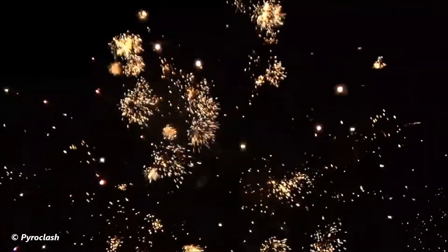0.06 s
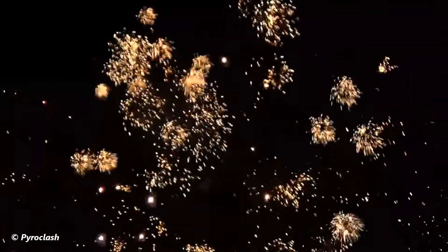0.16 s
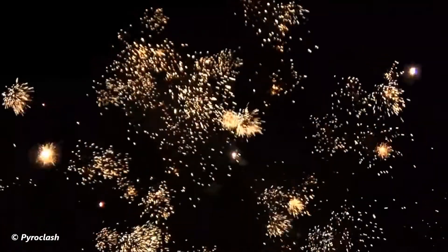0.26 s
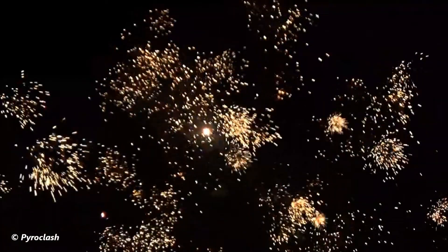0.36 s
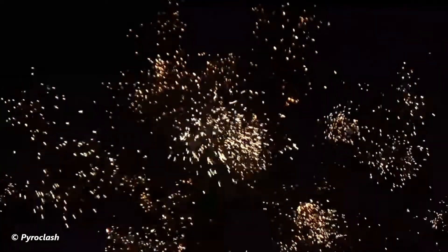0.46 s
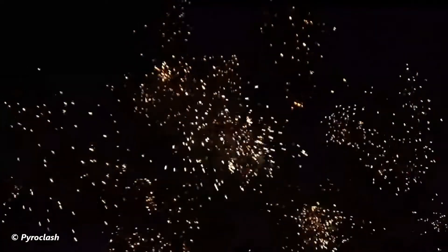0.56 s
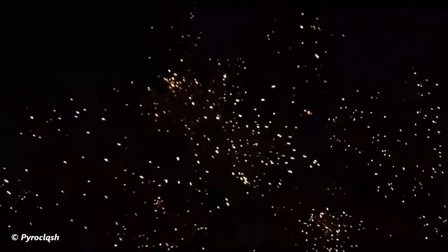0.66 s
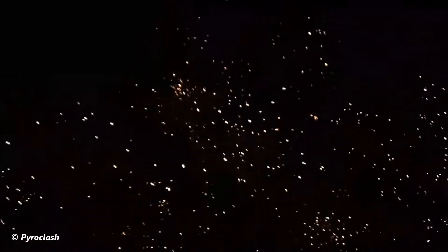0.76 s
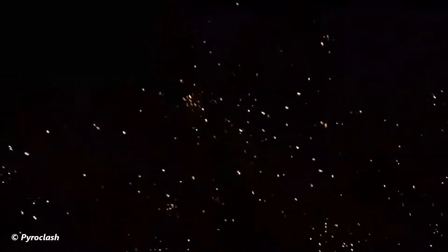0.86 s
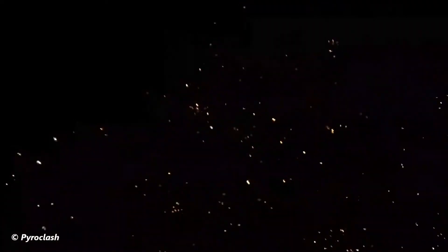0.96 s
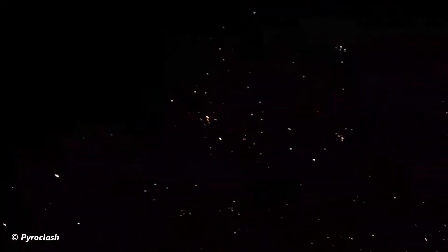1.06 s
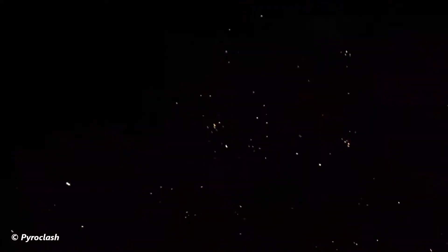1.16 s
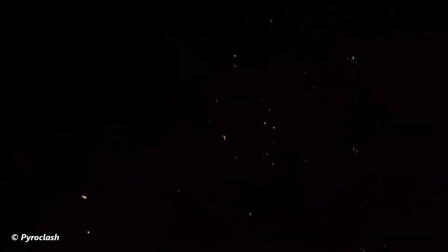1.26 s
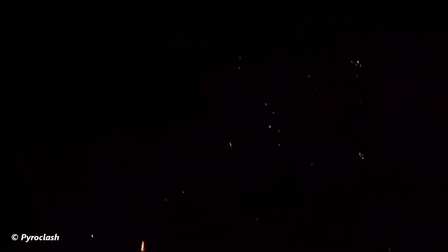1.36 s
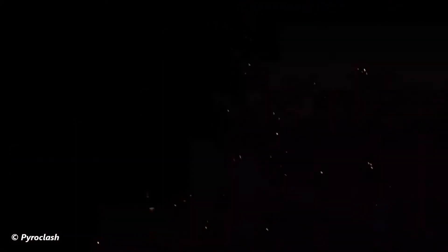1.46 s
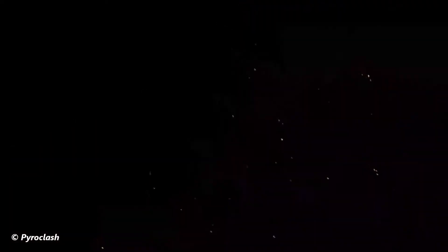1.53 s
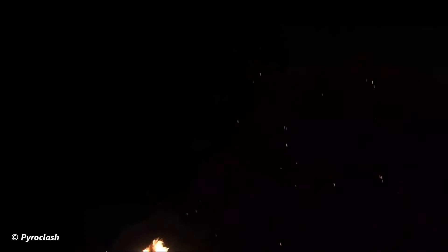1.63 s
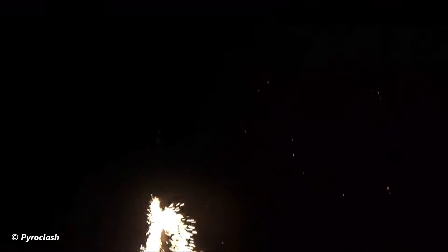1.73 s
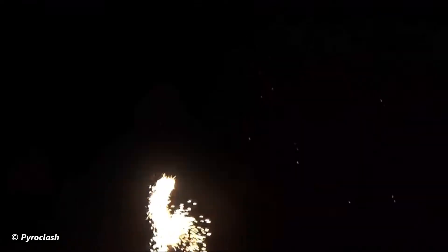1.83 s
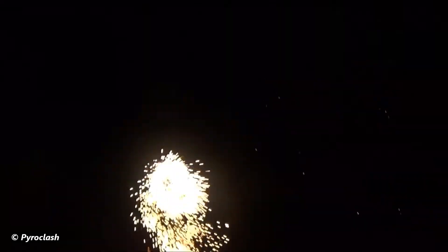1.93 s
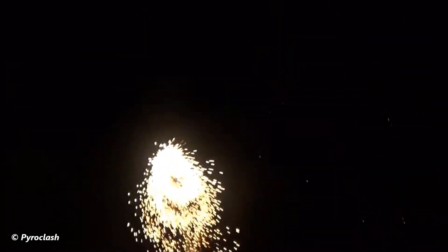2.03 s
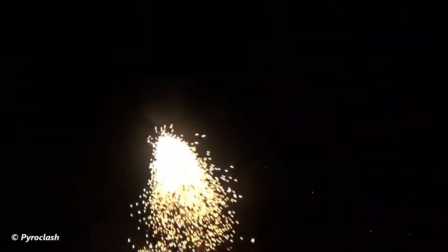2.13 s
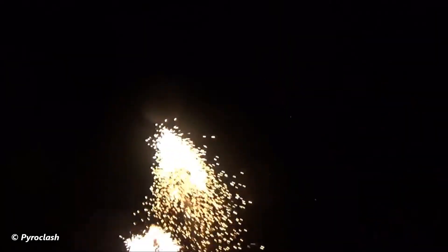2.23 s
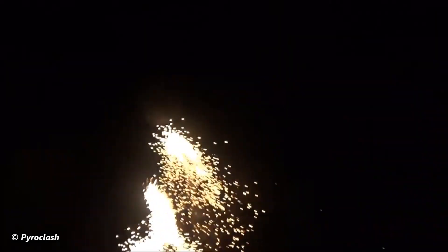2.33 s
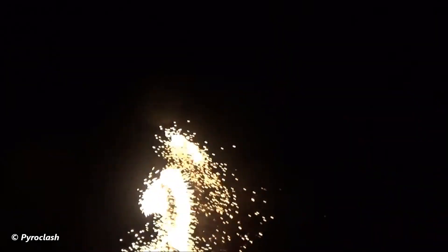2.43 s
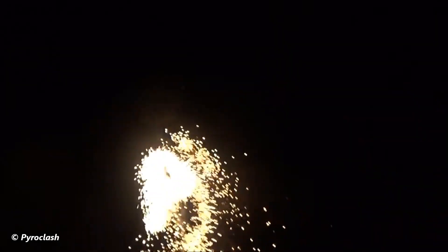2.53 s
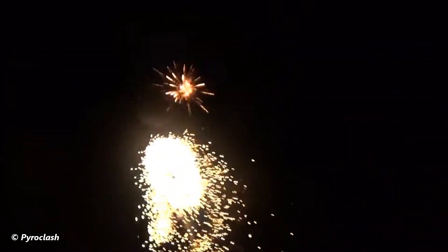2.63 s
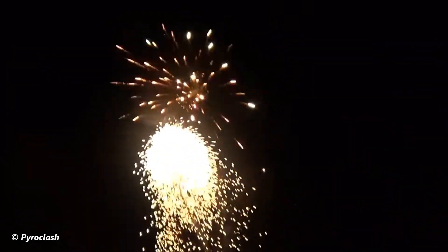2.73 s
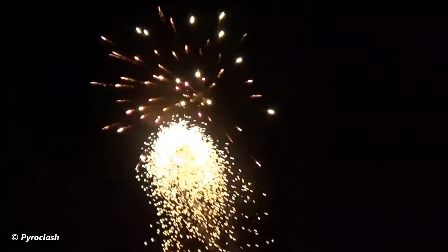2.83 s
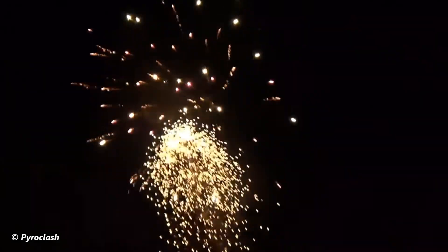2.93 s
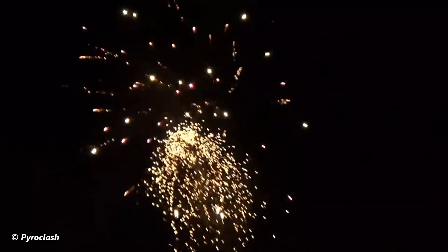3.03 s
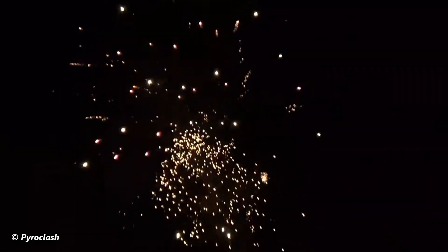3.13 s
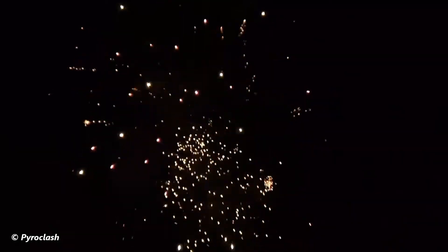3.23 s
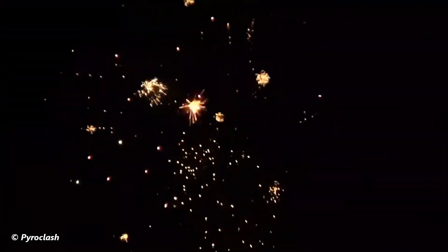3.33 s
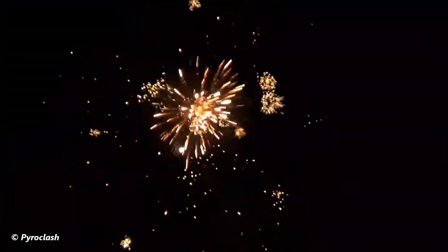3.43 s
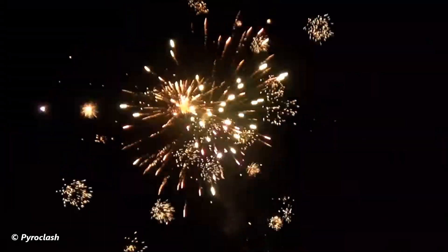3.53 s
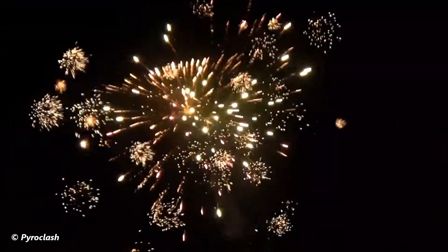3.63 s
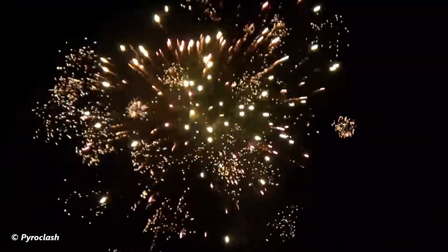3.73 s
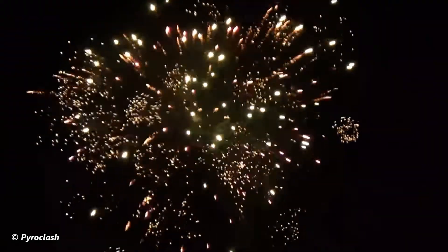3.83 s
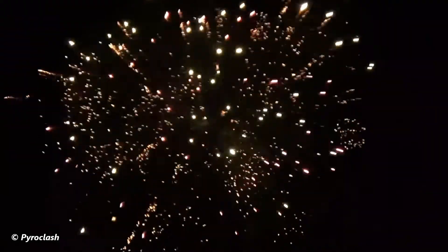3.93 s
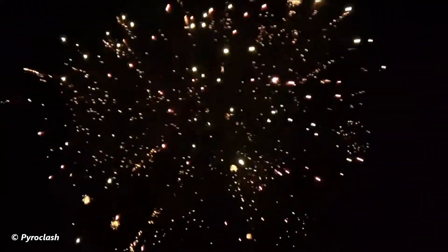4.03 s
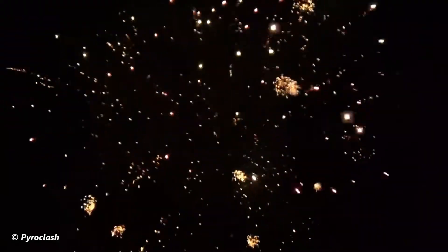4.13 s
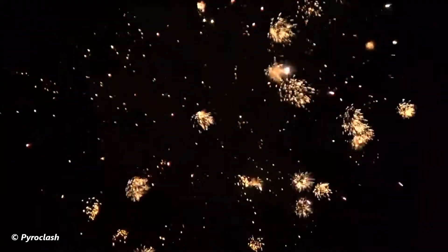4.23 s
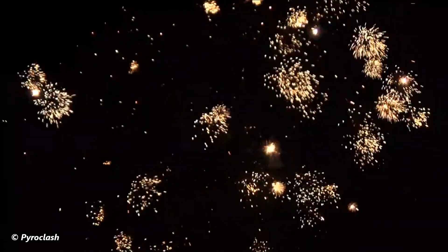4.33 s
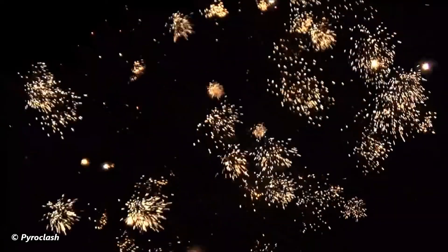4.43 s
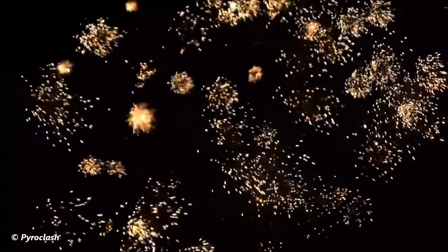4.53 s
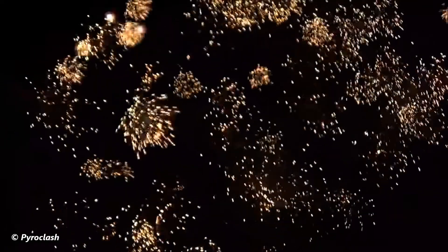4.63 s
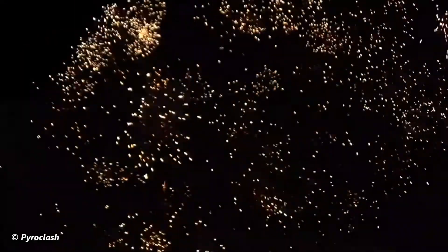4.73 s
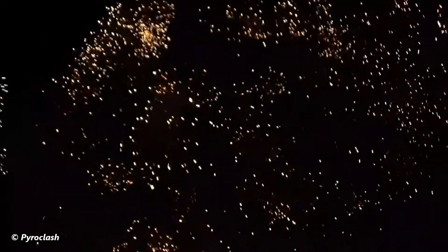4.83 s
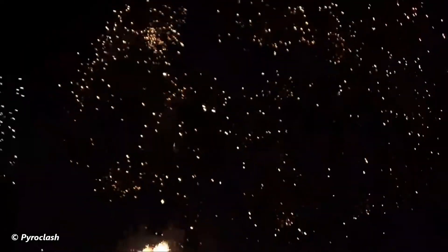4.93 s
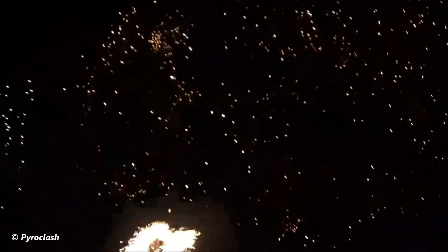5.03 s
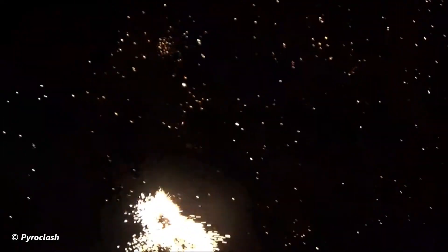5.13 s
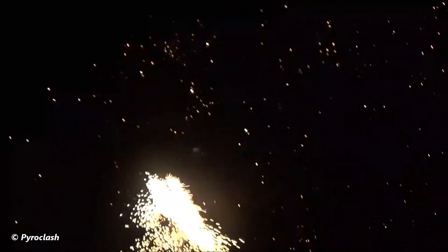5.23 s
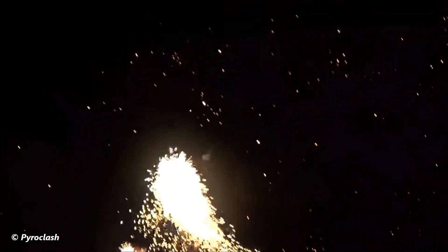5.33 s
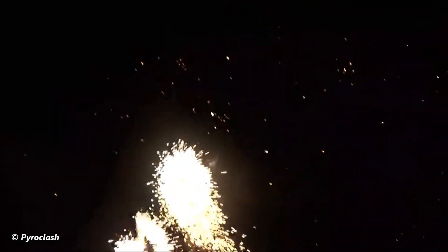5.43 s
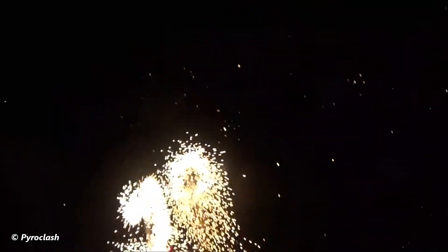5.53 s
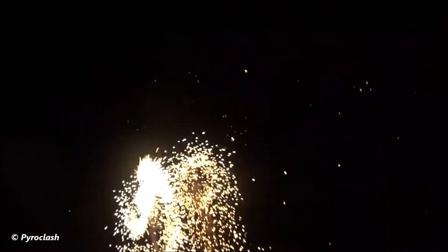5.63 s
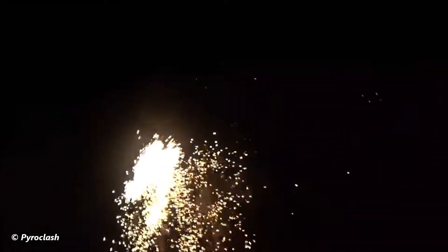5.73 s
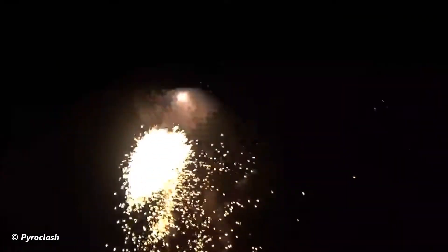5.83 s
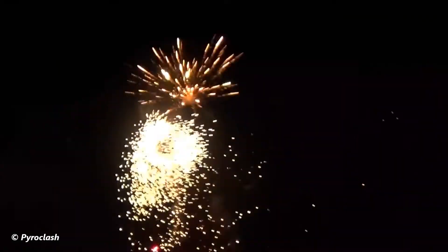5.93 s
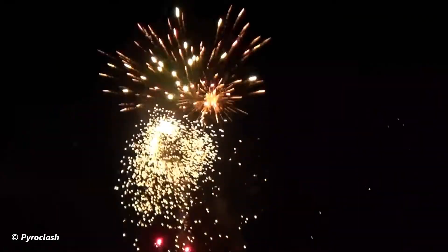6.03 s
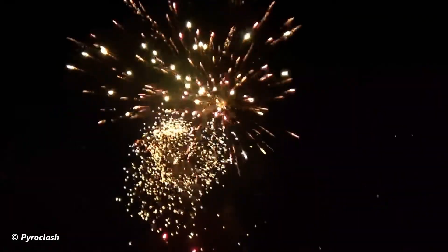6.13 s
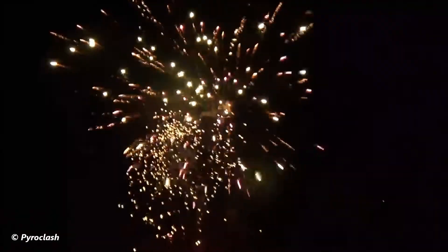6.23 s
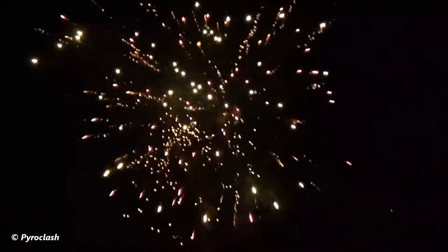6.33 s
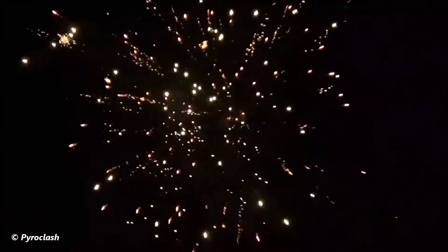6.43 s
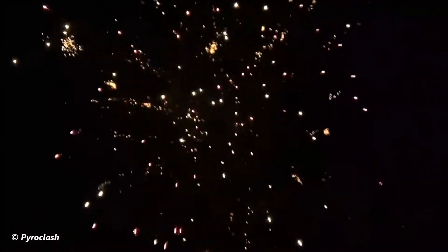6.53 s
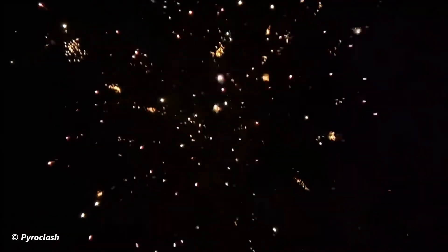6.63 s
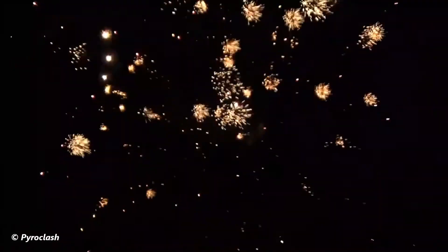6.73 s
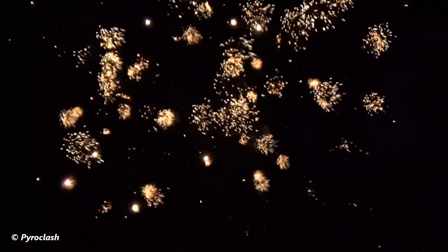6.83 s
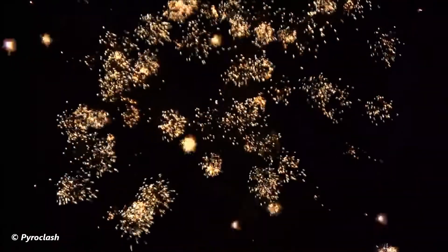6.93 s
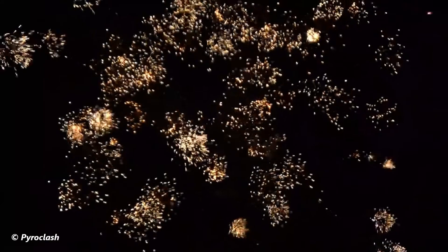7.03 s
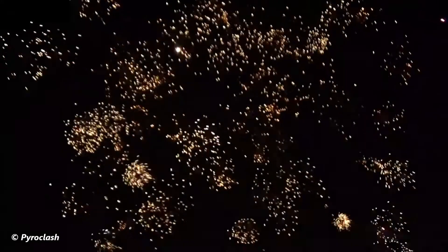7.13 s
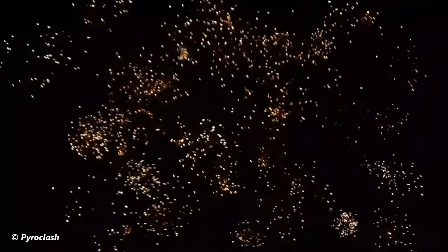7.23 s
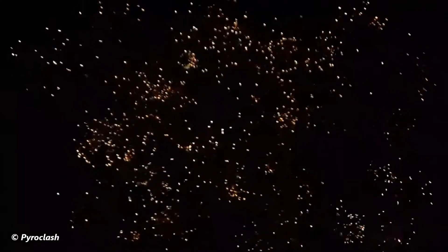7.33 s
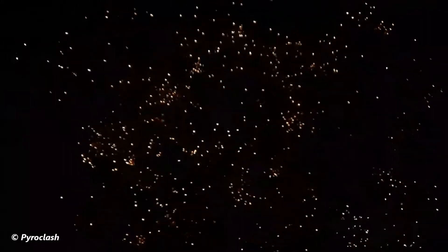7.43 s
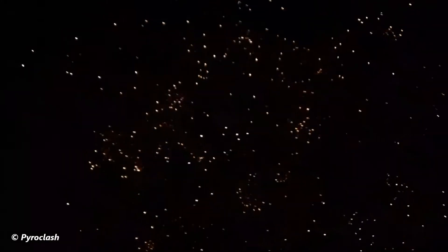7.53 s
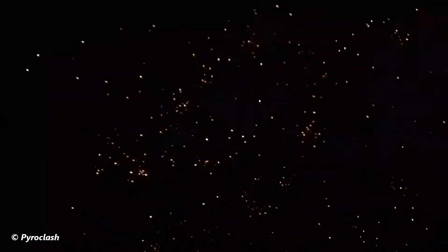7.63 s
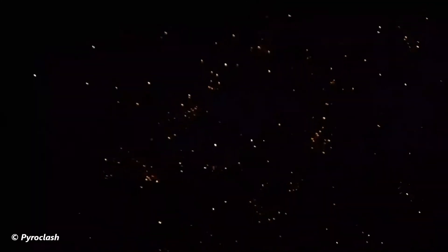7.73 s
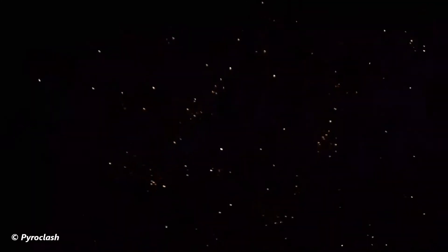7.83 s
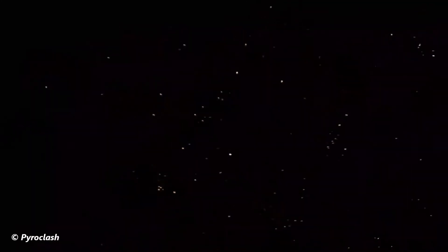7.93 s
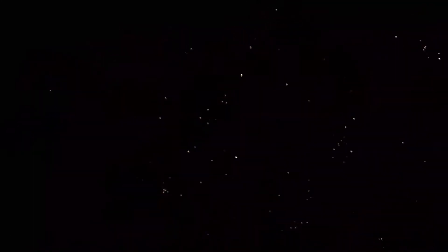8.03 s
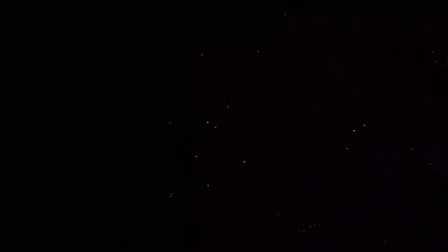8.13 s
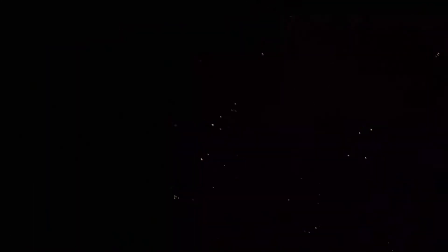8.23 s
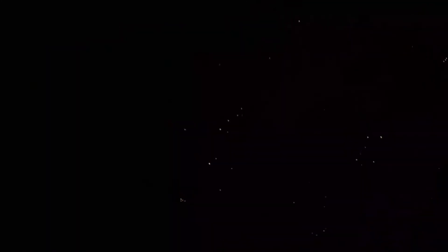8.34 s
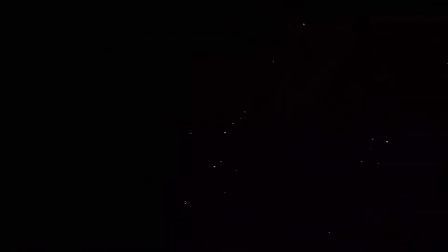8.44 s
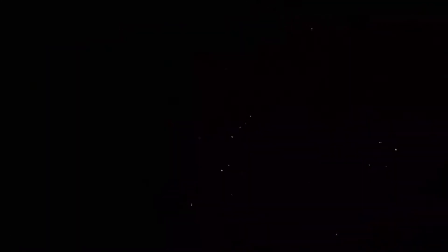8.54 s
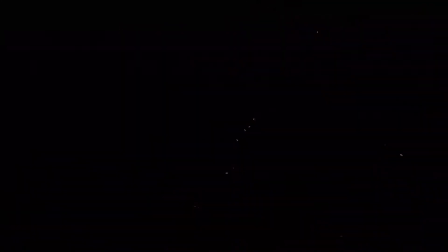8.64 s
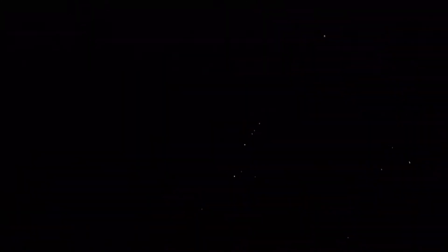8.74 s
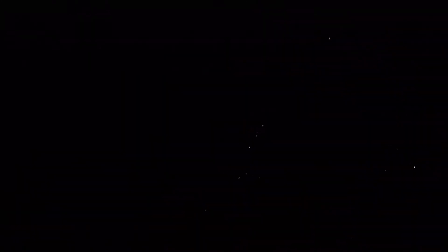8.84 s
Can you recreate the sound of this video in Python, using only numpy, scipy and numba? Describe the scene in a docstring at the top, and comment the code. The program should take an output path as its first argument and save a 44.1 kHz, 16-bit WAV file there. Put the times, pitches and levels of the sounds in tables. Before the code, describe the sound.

Fireworks cake at night in a street: dense crackling stars, hissing rising comets, thumping mortars, booming shell bursts, long house echoes, then distant rumble.

```python
"""Stars crackle and sizzle overhead while far fireworks rumble over town: a cake fires in a street at night.
A falling zip passes, then comets hiss upward, mortars thump and shells burst into more crackling stars.
Shock waves make the snaps and thumps; coloured noise makes the hiss, the rumble and the long house echoes.
A fence answers each shell with a falling chirp, and a fast limiter ducks the loud moments."""
import sys
import numpy as np
from scipy import signal
from scipy.fft import rfft, irfft, next_fast_len
from scipy.io import wavfile
from scipy.ndimage import uniform_filter1d, minimum_filter1d, map_coordinates
from numba import njit

SR = 44100
rng = np.random.default_rng(int(sys.argv[2]) if len(sys.argv) > 2 else 0)


def to_wav(sig):
    """Store sig (one row per channel, or 1-D mono) as 16-bit WAV at the path in sys.argv[1].

    Samples outside -1..1 are clipped; the rate is SR.
    """
    pcm = np.clip(np.atleast_2d(sig), -1, 1) * 32767
    pcm = np.round(pcm).astype(np.int16)
    wavfile.write(sys.argv[1], SR, pcm.T)  # frames by channels


N = 391166
TIME = np.arange(N) / SR
TAIL = TIME[:2 * SR]  # time axis of every echo, s

# clouds of crackling stars, thickest midway: start_s, end_s, rate (pops per s),
# top_db (loudest pop, before its size and the snap filter), sizzle_db
CLOUDS = [(0, .09, 146, -10, -32), (0.103, 0.22, 190, -5, -29), (0.241, .45, 320, -4, -30),
          (0.464, 0.636, 145, -9, -28.5), (3.288, 3.502, 25, -22, -40), (3.7, 3.998, 117, 0, -36),
          (4.046, 4.21, 38, -29, -38), (4.297, 4.778, 290, -5, -27.5), (6.906, 7.123, 300, -3.5, -27.5),
          (7.135, 7.28, 133, -11, -30.5)]
# how long the street echoes sounds from overhead: pitch_hz, t60_s
STREET = [(80, 1.74), (400, 1.56), (1500, 1.42), (4000, 1.35), (10000, 0.27)]


def amp(db):
    """dB to gain."""
    return 10 ** (np.asarray(db) / 20)


def along(points, hz):
    """Interpolate (Hz, value) points on a log frequency axis."""
    f, v = np.transpose(points)
    return np.interp(np.log(hz + 1), np.log(f + 1), v)


def wobble(rate, n):
    """A smooth random curve n samples long, with rate knots a second."""
    knots = rng.standard_normal(int(n * rate / SR) + 4)
    return map_coordinates(knots, [np.arange(n) * rate / SR])


def filtered(x, response):
    """Multiply the spectrum of x by a complex response of frequency."""
    n = x.shape[-1]
    m = next_fast_len(n + 4096, True)
    spectrum = rfft(x, m) * response(np.fft.rfftfreq(m, 1 / SR))
    return irfft(spectrum, m)[..., :n]


def add(track, s, sound):
    """Mix a sound into the track at time s."""
    start = max(round(s * SR), 0)
    part = track[..., start:start + sound.shape[-1]]
    part += sound[..., :part.shape[-1]]


def rush(tone, n, grain_db):
    """Coloured stereo noise whose mid has rms 1, made of tiny bursts of uneven size."""
    # stereo width of the noise: pitch_hz, side_to_mid_db
    width = [(100, -10.5), (400, -8), (1500, -6), (4000, -6), (9000, -11)]

    def colour(hz):
        mid_and_side = [np.ones_like(hz), amp(along(width, hz))]
        return amp(along(tone, hz)) * mid_and_side

    grains = rng.standard_normal((2, n)) * amp(grain_db * wobble(1500, n))
    mid, side = filtered(grains, colour)
    return np.array([mid + side, mid - side]) / np.std(mid)


def echoes(tone, decay, build, clump_db):
    """Reflections off the houses build up (build in s), come in clumps and decay at each pitch's own t60."""
    noise = rush(tone, len(TAIL), grain_db=2)
    hz, t, z = signal.stft(noise, SR, nperseg=256)
    decayed = z * amp(-60 * t / along(decay, hz)[:, None])
    tail = signal.istft(decayed, SR, nperseg=256)[1][:, :len(TAIL)]
    onset = 1 - np.exp(-(TAIL / build) ** 2)
    return tail * onset * amp(clump_db * wobble(57.7, len(TAIL)))


def blast(push, low_hz, top_hz):
    """A shock front, push seconds of overpressure, then suction; it loses bass and treble on the way."""
    u = TIME[:SR // 20] / push
    band = signal.butter(2, [low_hz, top_hz], 'band', fs=SR, output='sos')
    wave = signal.sosfilt(band, (1 - u) * np.exp(-u))
    return wave / np.abs(wave).max()


def chirp(t, start_hz, end_hz, glide):
    """A tone that falls fast and levels off (glide in s), ragged in pitch and level."""
    hz = end_hz + (start_hz - end_hz) * np.exp(-t / glide)
    phase = 2 * np.pi * np.cumsum(hz) / SR + .75 * wobble(220, len(t))
    return np.sin(phase) * amp(3.5 * wobble(90, len(t)))


def swell(start, end, db, rise, fade):
    """A gain that rises to db at start, holds until end and fades; slopes in dB a second."""
    return amp(db - rise * np.maximum(start - TIME, 0) - fade * np.maximum(TIME - end, 0))


def stars(bunching=.3):
    """All pops (s, dB, overpressure ms): single stars, and clouds of mostly faint ones bunched midway."""
    # single stars that stand out; short ones snap, long ones thud: start_s, level_db, overpressure_ms
    pops = list([(0.0234, -10, 0.11), (0.0977, 0, 0.032), (0.1021, -9, 0.052), (0.1219, 3, 0.09),
                 (0.1262, -1, 0.1), (0.1324, -6, 0.16), (0.1365, -7, .1), (0.1471, -10, 0.05),
                 (0.164, 2, 0.09), (0.1755, -7, .1), (0.182, -11.5, 0.096), (0.1933, 3.5, 0.11),
                 (0.2034, -4, 0.32), (0.2245, -4, 0.06), (0.2285, -9, 0.042), (0.2355, -9, .08),
                 (0.246, -5.5, 0.043), (0.2511, -5, 0.033), (0.2616, -17, 0.095), (0.27, -10, .08),
                 (0.2797, -12, 0.1), (0.2885, -10, .09), (0.3016, -11, 0.18), (0.3379, 0.5, 0.09),
                 (0.3471, -18, 0.045), (0.3573, -2, 0.088), (0.3651, -16, 0.05), (0.3745, -7, .08),
                 (0.3828, -12, 0.1), (0.388, -7, 0.12), (0.3961, -9, 0.09), (0.4056, -9, 0.11),
                 (0.4262, -1, 0.19), (0.4376, -13, 0.17), (0.4664, -7, 0.2), (0.4768, 3.5, 0.046),
                 (0.4868, -4.5, 0.2), (0.5011, -7, 0.2), (0.5273, -1, 0.15), (0.539, -7, 0.22),
                 (0.5429, -17, 0.034), (0.5581, 1, 0.12), (0.567, -10, 0.066), (0.6416, -5, 0.2),
                 (0.6493, -0.5, 0.11), (0.6542, -13, 0.066), (3.3311, -1.5, 0.018), (3.3392, 1, 0.02),
                 (3.3844, 2, 0.022), (3.3933, -5, 0.033), (3.4221, 4, 0.024), (3.4323, -11, 0.068),
                 (3.5043, -4, 0.026), (3.8909, 0, 0.17), (3.9186, -2, 0.11), (3.9358, -2, 0.24),
                 (3.9666, -21, 0.12), (4.058, -6, 0.26), (4.0612, -14, 0.2), (4.0677, -11, 0.1),
                 (4.0709, -18, 0.11), (4.0928, -10.5, 0.21), (4.1683, 3, 0.017), (4.1844, -10.0, 0.03),
                 (4.1931, -7.5, 0.04), (4.3773, -1, 0.27), (4.395, 4.5, 0.048), (4.4212, -19, 0.14),
                 (4.4295, -1, 0.071), (4.4473, -22, 0.13), (4.4617, -13, 0.09), (4.4778, -11, 0.05),
                 (4.4988, -11, 0.24), (4.5384, -12, 0.04), (4.5738, -22, 0.082), (4.5886, -5, 0.068),
                 (4.6403, -20, 0.19), (4.651, 2, 0.18), (4.661, 0, 0.13), (4.6924, -17, 0.094),
                 (4.7249, -14, 0.08), (4.7401, 0, 0.31), (6.7857, -9.5, 0.19), (6.8226, -1.5, 0.028),
                 (6.8359, 3, 0.075), (6.8465, 5, 0.05), (6.8568, -11, 0.11), (6.8784, 1.5, 0.15),
                 (6.8868, -3, 0.09), (6.9071, 0, 0.2), (6.9176, -9, 0.17), (6.9287, 0, 0.074),
                 (6.9476, -8.5, 0.05), (6.9548, 1, 0.14), (6.9828, 0, 0.1), (6.9903, 2.5, 0.028),
                 (7.0146, -26, 0.15), (7.0426, -4, 0.15), (7.0543, -10, 0.13), (7.0637, -1, 0.15),
                 (7.0863, -16, 0.061), (7.1088, 1, 0.15), (7.1194, -6, 0.21), (7.129, 1.5, 0.11),
                 (7.1341, 0, 0.068), (7.1432, -7, 0.084), (7.1693, -5, 0.025), (7.1759, -6, 0.077),
                 (7.1984, 1, 0.21), (7.2038, -2, 0.098), (7.2137, -9, 0.19), (7.2402, -0.5, 0.2),
                 (7.29, -2, 0.17), (7.2978, -5.5, 0.13), (7.306, -17, 0.15), (7.3771, -1.5, 0.15),
                 (7.3849, -23, 0.14), (7.4218, -9.5, 0.11), (7.683, -18.5, .02), (7.755, -26, .02),
                 (7.9, -31, .02), (8.155, -33, .02)])
    range_db = 20  # from the loudest pop of a cloud to the faintest, before their sizes
    usual_ms, spread = 0.17, 0.34  # median overpressure of a star; its scatter, natural log
    for start, end, rate, top_db, _ in CLOUDS:
        count = int((end - start) * rate)
        slot, faint = rng.random((400, 2))[:count].T
        size = np.exp(spread * rng.standard_normal(400)[:count])
        u = (np.arange(count) + slot) / count
        u = u + bunching * np.sin(2 * np.pi * u) / (2 * np.pi)
        # a short front peaks higher than a long one of the same energy
        db = top_db - range_db * faint ** 0.43 - 10 * np.log10(size)
        pops += zip(start + (end - start) * u, db, usual_ms * size)
    return pops


def crackle(direct_db=6.5, echo_db=-37.5, near_db=-32):
    """Each star ends in a tiny shock wave; the street smears them into a wash, and fine sparks sizzle."""
    # spectrum of the snaps: pitch_hz, level_db
    pop_tone = [(50, -9), (150, -24.5), (400, -4.5), (1500, -1), (4000, 4), (9000, 7), (11000, 6.5)]
    # spectrum of the wash and the sizzle: pitch_hz, level_db
    crackle_tone = [(35, -33), (60, -15), (170, -16), (290, -2), (383, -9), (769, -1), (999, 1),
                    (2910, 3.5), (9040, 1), (11000, -5), (14300, -68), (22000, -120)]
    rise_db_per_s, fade_db_per_s = 114, 56  # slopes of the sizzle

    shocks, t = np.zeros(N), TIME[:SR // 200]
    for s, db, push_ms in stars():
        u = 1000 * t / np.clip(push_ms, .02, .3)
        add(shocks, s, amp(db) * np.diff(u * np.exp(-u)) / u[1])

    def snap_response(hz):
        # the treble leads the rest, so that each snap swings both ways
        treble_first = (2400 - 1j * hz) / (2400 + 1j * hz)
        return amp(direct_db + along(pop_tone, hz)) * treble_first

    snaps = filtered(shocks, snap_response)
    street = amp(echo_db) * echoes(crackle_tone, STREET, build=.06, clump_db=0)
    # things close to the listener add a brief scatter (t60 6 ms) right behind each snap
    street += amp(near_db) * rush(pop_tone, len(TAIL), grain_db=3) * amp(-60 * TAIL / .006)
    wash = signal.fftconvolve(shocks[None], street, axes=1)[:, :N]
    swells = [swell(start, end, db, rise_db_per_s, fade_db_per_s) for start, end, _, _, db in CLOUDS]
    sizzle = np.max(swells, axis=0) * rush(crackle_tone, N, grain_db=3)
    return snaps + wash + sizzle


def town(echo_db=-12.0):
    """Far fireworks merge into a noise rumble; dull shots, a fizzing burst and a booming shell stand out."""
    # level of the rumble over time: start_s, level_db
    rumble_levels = [(0, -27.5), (.3, -36.5), (1, -37), (6.8, -32.5), (7.4, -39.5), (8, -43), (8.5, -45),
                     (8.87, -46)]
    # spectrum of the rumble: pitch_hz, level_db
    town_tone = [(18, -72), (30, -35), (123, -15.5), (251, -5.5), (432, 2), (642, 1.5), (709, 0.5),
                 (1110, -0.5), (2620, -9.5), (4990, -23), (9480, -27), (11000, -31), (14300, -75),
                 (22000, -120)]
    # far shots: start_s, level_db (peak of the thud), echo_t60_s
    far_shots = [(2.3895, -10.5, 0.18), (5.68, -16, .22), (8.215, -23, 0.14), (8.275, -21.5, 0.24),
                 (8.429, -23.5, 0.27), (8.51, -28, 0.23), (8.767, -30, 0.12)]
    # spectrum of the far shots' echoes: pitch_hz, level_db
    far_tone = [(60, -34), (200, -1), (450, 0), (750, 1), (1500, -10), (2600, -17), (4500, -48),
                (10000, -39)]
    # spectrum of the booming shell's echo: pitch_hz, level_db
    boom_tone = [(60, -28), (200, -11), (400, 11.5), (750, 6), (1500, -4), (2800, -15), (4000, -41),
                 (10000, -36)]
    # a far burst fizzes; a very faint steady hiss lies under the quiet end:
    # start_s, end_s, level_db, rise_db_per_s, fade_db_per_s
    far_fizz = [(8.353, 8.41, -37, 900, 102), (8.45, 8.6, -61, 60, 15)]
    # spectrum of the fizz and the faint hiss: pitch_hz, level_db
    fizz_tone = [(200, -12), (900, 9), (2000, 4), (4000, -5), (9500, -11.5), (11000, -19)]
    boom_s, boom_db, boom_t60_s = 8.766, -28.5, 0.43

    waver_db = .7 * wobble(18, N)
    rumble_db = np.interp(TIME, *np.transpose(rumble_levels)) + waver_db
    out = amp(rumble_db) * rush(town_tone, N, grain_db=1.0)
    thud = blast(push=.0007, low_hz=350, top_hz=1800)
    for s, db, t60 in far_shots:
        add(out, s + .002, amp(db) * thud)
        add(out, s, amp(db + echo_db) * echoes(far_tone, [(500, t60)], build=.005, clump_db=1))
    boom = echoes(boom_tone, [(500, boom_t60_s)], build=.005, clump_db=1)
    add(out, boom_s, amp(boom_db) * boom)
    fizz = sum(swell(*row) for row in far_fizz) * rush(fizz_tone, N, grain_db=1.5)
    return out + fizz


def zip_by():
    """A short falling zip among the crackling stars: one chirp that swells and fades."""
    start_s, length_s, level_db = .576, .056, -23.5
    out, t = np.zeros(N), TIME[:int(length_s * SR)]
    tone = chirp(t, start_hz=4600, end_hz=1450, glide=.015)
    add(out, start_s, amp(level_db) * np.hanning(len(t)) * tone)
    return out


def comets():
    """Rising tails burn with a bright, fluttering noise hiss that grows until burn-out; some flare up."""
    # volleys, whose hiss grows as they climb: launch_s, burn_out_s, launch_db, top_db
    volleys = [(1.054, 2.753, -27.5, -23), (4.792, 5.98, -27, -18)]
    # a comet flares up: brightest_s, width_s (standard deviation of the bell curve), level_db
    flares = [(1.81, 0.019, -21), (2.04, 0.08, -23), (2.21, 0.0078, -17), (2.256, 0.013, -15),
              (2.59, 0.074, -18), (2.74, 0.085, -18.5), (5.2, 0.028, -18.5), (5.31, 0.021, -18),
              (5.5, 0.039, -17.5), (5.635, 0.02, -20), (5.715, 0.016, -14), (5.9, 0.087, -15.5),
              (5.99, 0.017, -33)]
    # spectrum of the hiss: pitch_hz, level_db
    hiss_tone = [(400, -25), (1200, -3), (2500, -1.5), (4000, -0.5), (6000, 1), (9500, 5), (11000, -1.5)]
    fade_db_per_s = 67  # the hiss dies away after burn-out

    power = sum((amp(db) * np.exp(-((TIME - s) / width) ** 2 / 2)) ** 2 for s, width, db in flares)
    for start, end, launch_db, top_db in volleys:
        climb_db = np.interp(TIME, [start, end], [launch_db, top_db])
        fade_db = fade_db_per_s * np.maximum(TIME - end, 0)
        power = power + (TIME > start) * amp(climb_db - fade_db) ** 2
    flutter_db = 1.4 * wobble(90, N) + .7 * wobble(24, N)
    return np.sqrt(power) * amp(flutter_db) * rush(hiss_tone, N, grain_db=2)


def yard_ring(length):
    """The hollow ring of the yard: decaying sine modes, a little different for every shot."""
    # modes that every mortar rings: pitch_hz, level_db, t60_s (at echo length 1)
    modes = [(189.5, -27, 1), (236.3, -18, 0.88), (299, -25, .8), (344, -32, 0.53), (618, -15, 0.97)]
    ring = 0
    for hz, db, t60 in modes:
        level_db = db + rng.normal(0, 1.4) - 60 * TAIL / (length * t60)
        ring = ring + amp(level_db) * np.sin(2 * np.pi * (hz * TAIL + rng.random()))
    return ring * (1 - np.exp(-TAIL / .015))


def mortars(jet_db=6, across_s=0.1):
    """Each lift charge kicks its tube, cracks, spits a jet of gas, slaps off near walls and rings on."""
    # mortar shots: start_s, blast_db, echo_db, across_db (house row, against the echo), echo length (0-1)
    lifts = [(1.0583, -0.5, -11, -3.5, 0.7), (1.2969, -1.5, -14, -5.5, 1), (1.604, -3, -11, -4.5, 0.77),
             (1.8341, 3, -14, -5, 0.94), (2.0895, 1, -15.5, -4, 1), (4.2332, -1, -13.5, -10.5, 0.68),
             (4.5084, -4, -21, 1.5, 0.6), (4.7884, -2.5, -13.5, -4.5, 1), (5.0175, 0, -17, -5.5, 1),
             (5.3782, 1, -15.5, -7.5, 0.48)]
    # spectrum of the echoes: pitch_hz, level_db
    lift_tone = [(18, -57), (30, -54), (91, -18.5), (284, -0.5), (321, -6), (355, 3), (466, -6), (596, 3),
                 (802, -4), (1150, 1), (1350, -4), (1650, -1), (2600, -6.5), (4410, -10.5), (9480, -11),
                 (11000, -8), (14300, -66), (22000, -120)]
    # spectrum of the gas jet: pitch_hz, level_db
    jet_tone = [(25, -42), (80, -19), (300, 7), (1200, -15), (3500, -15.5), (9500, -7), (11000, -14.5)]
    # echo of sounds from the ground: pitch_hz, t60_s (at echo length 1)
    yard = [(80, 1), (400, 1), (1500, 0.99), (4000, 0.77), (10000, 0.08)]
    # near walls that slap each shot back: delay_s, level_db (against the blast)
    slaps = [(.0034, -5.5), (0.0134, -3), (.043, 2)]
    # cars and hedges scatter the jet's spit: delay_s, level_db (against the echo)
    spatters = [(.019, -1.6), (.052, -0.26)]
    kick_lead_s, kick_db = .0056, -9  # the tube kicks the ground just before the shell leaves it

    out = np.zeros((2, N))
    kick = blast(push=.0007, low_hz=420, top_hz=850)
    crack = blast(push=0.00028, low_hz=320, top_hz=2800)
    spatter = np.hanning(int(0.02 * SR))  # 20 ms
    for s, db, roar_db, across_db, length in lifts:
        decay = [(hz, length * t60) for hz, t60 in yard]
        add(out, s - kick_lead_s, amp(db + kick_db) * kick)
        # the direct crack, then its slaps
        for delay, slap_db in [(0.00019, 0)] + slaps:
            add(out, s + delay, amp(db + slap_db) * crack)
        jet = rush(jet_tone, SR // 4, grain_db=4) * amp(-60 * TAIL[:SR // 4] / .04)
        add(out, s, amp(roar_db + jet_db) * jet)
        for delay, spatter_db in spatters:
            spit = rush(jet_tone, SR // 10, grain_db=3)[:, :len(spatter)]
            add(out, s + delay, amp(roar_db + spatter_db) * spatter * spit)
        roar = echoes(lift_tone, decay, build=.0066, clump_db=1.3)
        add(out, s, amp(roar_db) * (roar + yard_ring(length)))
        # the row of houses across the street answers a little later
        across = echoes(lift_tone, decay, build=0.0085, clump_db=1.5)
        add(out, s + across_s, amp(roar_db + across_db) * across)
    return out


def fence():
    """Evenly spaced slats return echoes whose rate falls and levels off: a short chirp."""
    t = np.maximum(TAIL - .033, 0)
    u = t / .05
    return u * np.exp(1 - u) * chirp(t, start_hz=3700, end_hz=1600, glide=.027)


def shells(scatter_db=-5, bounce=0.012, wall=0.2, wall_db=-15, far_roar_db=-11):
    """A burst arrives directly, again off the ground, then as a roar from the whole street and its far end."""
    # shell bursts overhead: start_s, blast_db, echo_db, fence_db (chirp, against the echo)
    bursts = [(2.769, 0.5, -9, -14.5), (3.517, -10, -12, -16), (3.662, -2, -10.5, -25),
              (6.0221, -2.5, -8.5, -13), (6.178, 0.5, -10, -16)]
    # spectrum of the roar: pitch_hz, level_db
    burst_tone = [(18, -65), (30, -43), (58, -31), (146, -14.5), (182, -10.5), (298, -1.5), (501, 2.5),
                  (642, 3.5), (907, -4), (1350, -4), (2320, -8.5), (2500, -10.5), (5510, -16), (9250, -8.5),
                  (11000, -7.5), (14300, -108), (22000, -120)]
    # spectrum of the brighter scatter: pitch_hz, level_db
    scatter_tone = [(300, -57), (1200, 8.5), (2500, 4), (5000, -2), (9500, 0), (11000, -7.5)]
    front_db = 4  # the sharp edge against the boom; only the direct path keeps it

    out = np.zeros((2, N))
    boom = blast(push=.0008, low_hz=290, top_hz=1150)
    front = blast(push=.00008, low_hz=1500, top_hz=10000)
    wall_gain = amp(wall_db)
    arrivals = [(0, 1), (bounce, 1), (wall, wall_gain), (wall + bounce, wall_gain)]
    for s, db, roar_db, fence_db in bursts:
        add(out, s, amp(db + front_db) * front)
        for delay, gain in arrivals:
            add(out, s + delay, gain * amp(db) * boom)
        roar = echoes(burst_tone, STREET, build=.023, clump_db=.6)
        # tiles and twigs scatter the sharp front as a brighter rush that swells a little later
        bright = echoes(scatter_tone, [(1000, 1.57), (10000, 1.02)], build=0.051, clump_db=1)
        answer = roar + amp(scatter_db) * bright + amp(fence_db) * fence()
        add(out, s, amp(roar_db) * answer)
        far_end = echoes(burst_tone, [(400, 1.0), (8000, 0.17)], build=0.09, clump_db=2)
        add(out, s + wall, amp(roar_db + far_roar_db) * far_end)
    return out


def scene():
    """Everything that reaches the listener."""
    return crackle() + town() + zip_by() + comets() + mortars() + shells()


@njit
def held(x, fall):
    """Follow peaks at once and let go slowly."""
    y = x.copy()
    for i in range(1, len(y)):
        y[i] = max(y[i], y[i - 1] * fall)
    return y


def record(dry, ceiling_db=-16.0, peak_db=1):
    """A limiter ducks just ahead of blasts and behind strong snaps, rounds peaks and ends the band steeply."""
    top_hz = 11040
    power = np.abs(uniform_filter1d(np.mean(dry ** 2, axis=0), size=150))
    ahead = -minimum_filter1d(-power, size=70)
    # the peak detector reacts 22 samples late: a snap gets through, and the wash behind it dips
    peak = np.roll(np.abs(dry).max(axis=0), 22)
    excess = np.maximum(np.sqrt(ahead) / amp(ceiling_db), peak / amp(peak_db))
    over = held(excess, np.exp(-1 / (.016 * SR)))  # lets go with a 16 ms time constant
    x = dry / uniform_filter1d(np.maximum(over, 1), size=12)
    x = x / (1 + np.abs(x / .75) ** 4) ** (1 / 4)
    return filtered(x, lambda hz: 1 / np.sqrt(1 + (hz / top_hz) ** 240))


dry = scene()
out = record(dry)
to_wav(out)
```